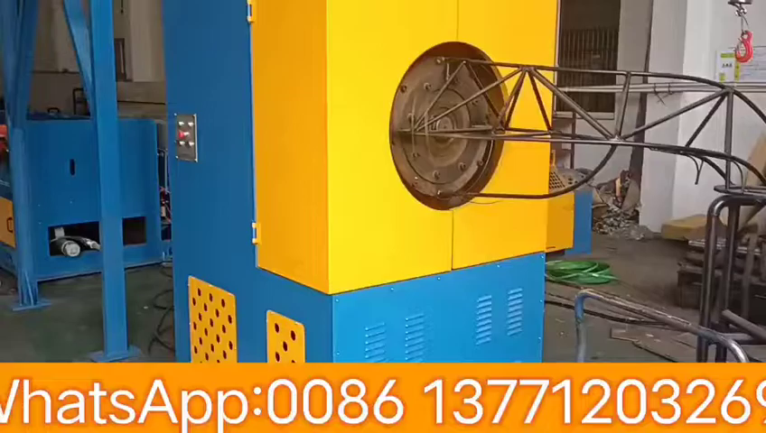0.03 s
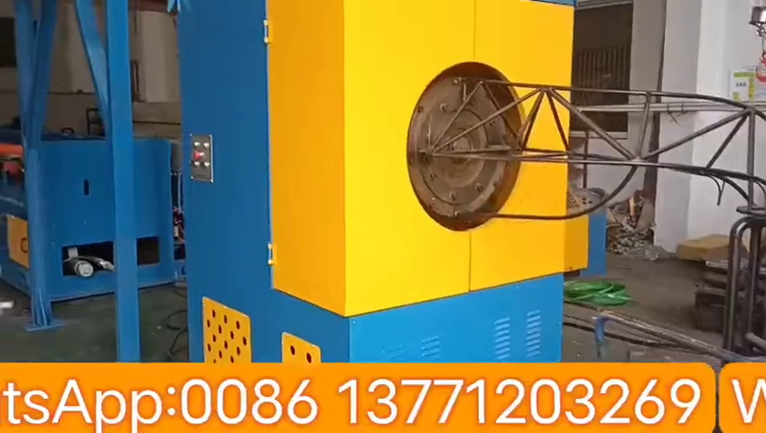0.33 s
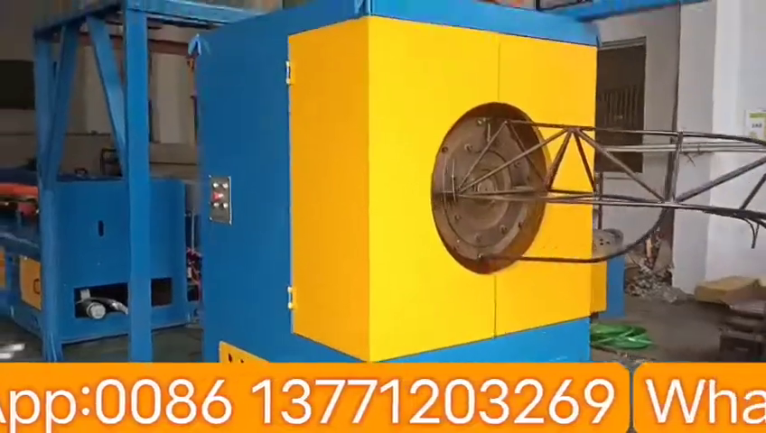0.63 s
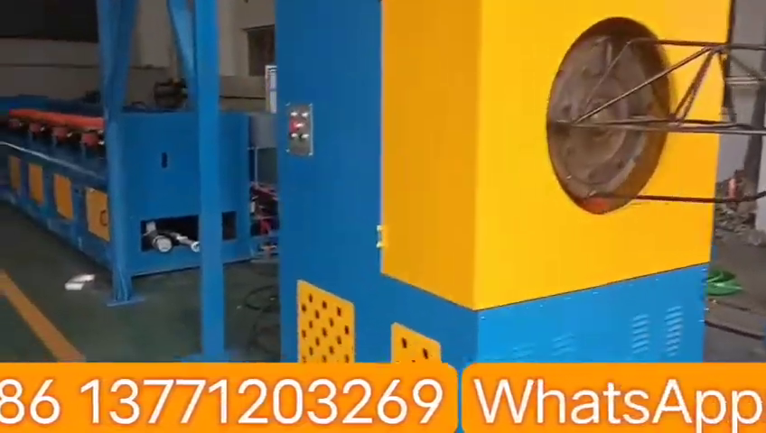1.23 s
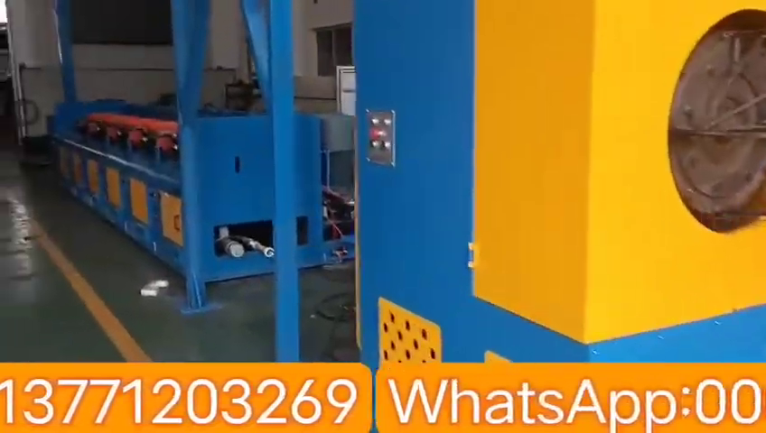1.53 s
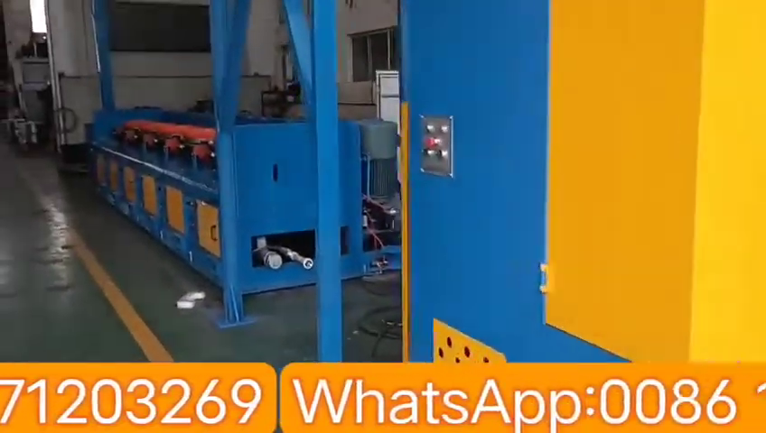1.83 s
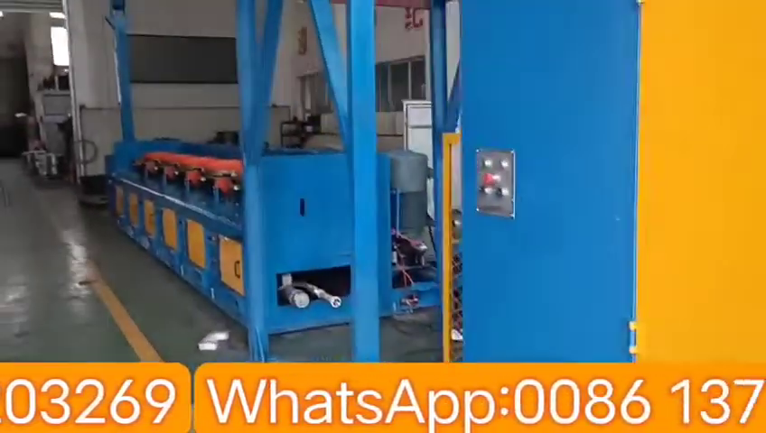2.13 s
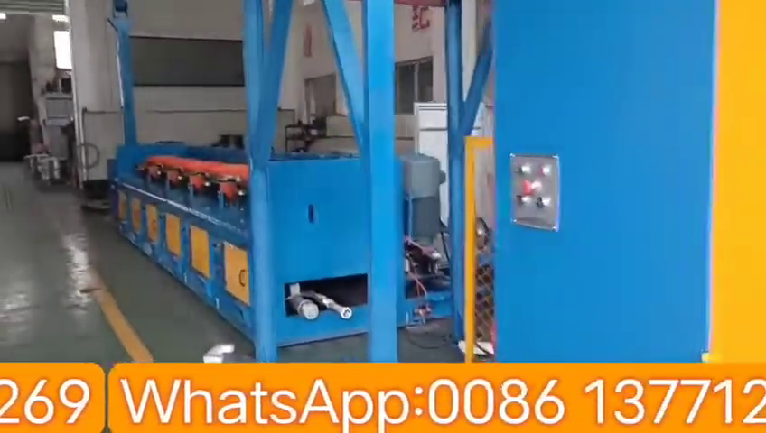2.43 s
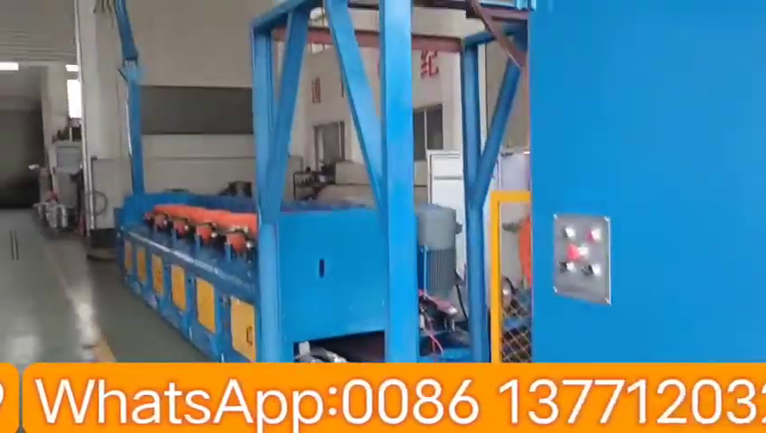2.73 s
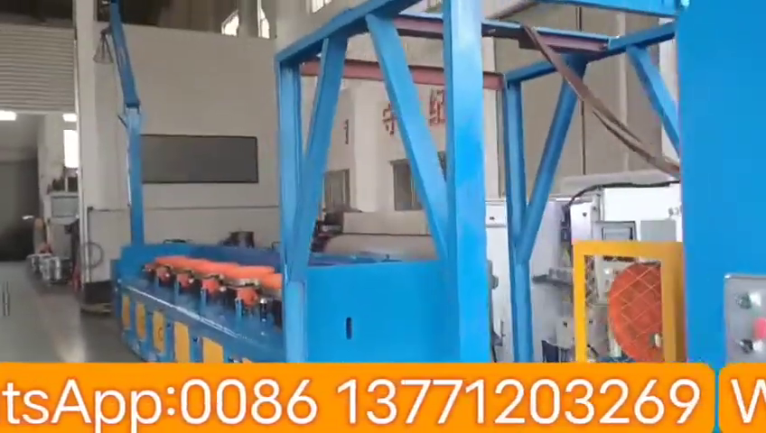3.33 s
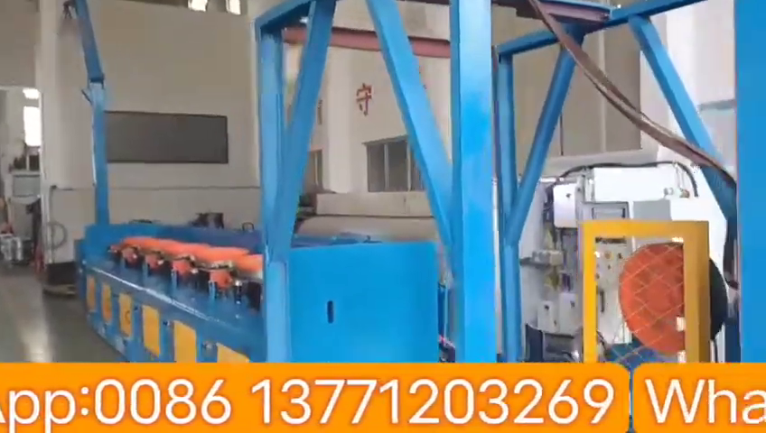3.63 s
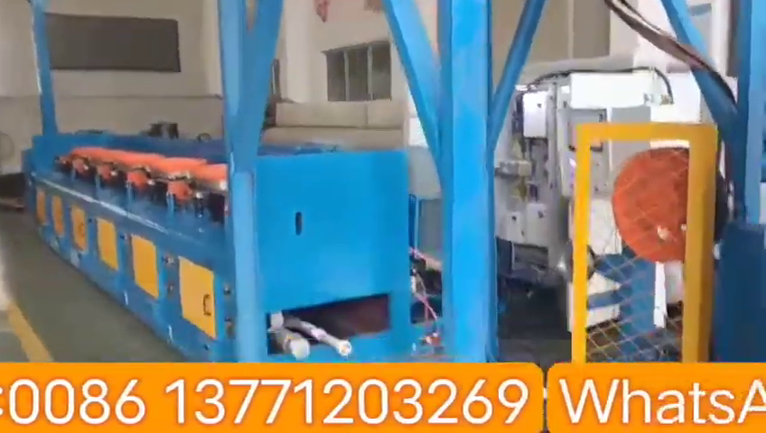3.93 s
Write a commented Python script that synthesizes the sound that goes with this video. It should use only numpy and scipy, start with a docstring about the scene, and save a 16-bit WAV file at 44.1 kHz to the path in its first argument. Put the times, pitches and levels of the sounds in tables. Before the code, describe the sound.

Factory machinery scrapes and hisses steadily as wire winds on, over humming and whining motors.

```python
"""Factory hall, walking past the coiler of a wire drawing line; the sound fades in.
Wire slips on steel: rasp and hiss. It taps the cage, sings on the drum once a turn
and squeals where it catches. Underneath: gearbox drone, whining gears and motor drives,
whirring drum, floor rumble, humming and booming sheet-steel housings."""
import sys
import numpy as np
from scipy import signal
from scipy.fft import rfft, irfft
from scipy.io import wavfile

SR = 44100
rng = np.random.default_rng(int(sys.argv[2]) if len(sys.argv) > 2 else 0)


def inscribe(sig):
    """Save sig as 16-bit PCM at rate SR to the path in sys.argv[1].

    A 1-D sig is mono; a 2-D sig holds one channel per row.
    Samples are clipped to [-1, 1] before scaling.
    """
    pcm = np.round(np.clip(np.atleast_2d(sig).T, -1, 1) * 32767)
    wavfile.write(sys.argv[1], SR, pcm.astype(np.int16))


N = 176400

TURN_HZ, TURN_AT_S = 6.17, .06
SLIPS_PER_S, SLIP_SPREAD_DB, SLIP_SHARE = 1800, 5, .34
BUZZ_HZ, BUZZ_DEPTH = 100, .097
TAPS_PER_S = 40
GEAR_HZ, GEAR_PULSE_DEPTH, THROB_S = 678, .63, .058
WHISTLE_HZ = 8010
GRATE_DB, NOTE_DB = -8, -1.2
TICK_DECAY_S, TAIL_DECAY_S, TAIL_DB = .0011, .024, -6
FADE_AT_S, FADE_S, FADE_POWER, CUTOFF_HZ = .19, .25, .84, 12100

# levels along the walk, before trims (time [s], hum [dB], drone [dB], whirr [dB], rasp [dB], hiss [dB])
WALK_LEVELS = [(0.3, -66, -53, -44.5, -40.5, -51), (0.42, -47, -46.5, -47, -42.5, -49),
               (0.63, -49.5, -52.5, -46, -41.5, -51), (0.9, -49.5, -50.5, -50.5, -42.5, -52),
               (1.1, -50.5, -50.5, -46, -42, -50), (1.33, -54.5, -49, -50.5, -42.5, -52),
               (1.5, -52.5, -55.5, -50.5, -43.5, -49.5), (1.8, -49.5, -45.5, -55.5, -43.5, -49),
               (2.1, -53.5, -47.5, -49.5, -44.5, -50.0), (2.35, -45, -43.5, -55.5, -44, -50),
               (2.53, -44, -52, -51.5, -44, -51), (2.85, -49, -45.5, -58, -45.5, -51),
               (3.1, -45, -46, -51, -45.5, -52), (3.3, -45, -50, -52.5, -47, -54.5),
               (3.55, -52.5, -46, -50.5, -46.5, -55.5), (3.8, -46.5, -44.5, -46.5, -47.5, -55),
               (4.0, -47.5, -44.5, -52, -47, -63.5)]
HUM_TRIM_DB, DRONE_TRIM_DB, WHIRR_TRIM_DB, RASP_TRIM_DB, HISS_TRIM_DB = -2, 2, 1, -.5, 5.5
# base levels along the walk (time [s], level [dB])
RUMBLE_LEVELS = [(.4, -69.5), (.76, -67), (.83, -59), (.95, -77), (1.88, -61.5), (1.99, -80), (2.16, -56),
                 (2.27, -71), (2.55, -63), (2.83, -55), (2.95, -68), (3.03, -59), (3.12, -67), (3.27, -53),
                 (3.63, -51), (4, -60.5)]
MAIN_GEAR_LEVELS = [(.3, -62), (.5, -55), (1.25, -52), (1.44, -60), (1.6, -52), (2.35, -51), (2.55, -53),
                    (2.85, -52), (3.9, -50.5)]
WHISTLE_LEVELS = [(.4, -63), (1.3, -56), (1.9, -53), (2.5, -55.5), (2.75, -52), (3.2, -57), (3.5, -51),
                  (3.7, -57.5), (3.9, -52.5)]
RUB_LEVELS = [(.4, -48), (.8, -52), (1.4, -49), (2.1, -47), (2.5, -54), (3, -53), (3.5, -60), (4, -54)]

# noise spectra (frequency [Hz], relative density [dB])
RASP_SPECTRUM = [(150, -23), (500, -17), (1000, -13), (1350, 3.5), (1600, 3), (1850, 4), (2200, 4.5),
                 (2600, 4.5), (3050, 0), (3350, 2.5), (3600, 2), (4200, 2.5), (5100, -10), (7000, -6),
                 (12000, -23)]
HISS_SPECTRUM = [(1500, -27), (3500, -6), (4600, 1.5), (5200, -2), (6000, 3), (6900, 2), (7500, -1),
                 (8900, -0.5), (9800, 2.5), (10700, 3), (11400, -5.5), (12100, -2)]
RUMBLE_SPECTRUM = [(15, -23), (35, 0), (50, -4.5), (75, 2), (125, 5.5), (180, -4), (300, 9), (800, -35)]
HUM_SPECTRUM = [(60, -44), (150, -14), (200, -7), (238, -4), (280, -2.5), (335, 4.5), (375, 2), (440, -17),
                (700, -34.5)]
DRONE_SPECTRUM = [(250, -42), (400, -11), (480, -1.5), (560, -0.5), (650, 2.5), (740, -3.5), (820, -17.5),
                  (1020, -35), (1350, -15), (1700, -14.5), (4000, -39)]
WHIRR_SPECTRUM = [(450, -63), (720, -1), (830, 4.5), (920, -2.5), (1050, -3.5), (1250, -1), (1600, -45)]
GRATE_SPECTRUM = [(4800, -22), (6000, -1), (6700, -2), (9000, -4)]
TICK_SPECTRUM = [(100, -50), (400, -6), (1200, -1), (2300, 8), (3200, -0.5), (4200, -6), (6000, -7),
                 (12000, -14)]

# cage resonances (frequency [Hz], t60 [s], relative level [dB])
CAGE_MODES = [(1359, 0.13, -1), (1809, 0.088, -0.5), (2014, 0.07, 0), (2300, 0.06, -4.5), (2600, 0.069, 0),
              (3233, 0.093, -6)]
# resonances of wire on the drum (frequency [Hz], half-width [Hz], relative level [dB])
DRUM_WIRE_MODES = [(5947, 36, -2), (6018, 36, 0), (6085, 60, -6), (6278, 70, 0), (6648, 60, -3),
                   (6750, 600, -3)]
# gear and drive tones (frequency [Hz], half-width [Hz], mid-walk level [dB], slope [dB/s])
GEAR_TONES = [(331.3, 91, -59, -1.5), (1358, 74, -60.5, 4.5), (1927, 26, -60, 0)]
DRIVE_TONES = [(2850, 50, -58, -1), (3272, 26, -60.5, -1.5), (3958, 40, -55, 1), (4046, 14, -54, -0.5),
               (7763, 38, -63, 0.4), (8262, 100, -63, -0.3)]

# main gear throbs (centre [s], level [dB])
GEAR_THROBS = [(.37, -41), (.455, -43), (.555, -50), (.765, -50), (.855, -42.5), (.935, -48), (1.06, -43.5),
               (1.545, -37), (1.63, -40), (1.795, -38), (1.945, -39.5), (2.07, -40), (2.125, -43.5),
               (2.28, -48), (2.375, -43.5), (2.645, -46.5), (2.77, -43), (2.86, -51), (2.975, -41),
               (3.135, -41.5), (3.26, -59), (3.38, -42.5), (3.53, -52), (3.655, -42.5), (3.825, -40.5),
               (3.885, -41)]
# brief resonances (start [s], length [s], pitch [Hz], level [dB])
METAL_RINGS = [(.51, .07, 2240, -49), (.58, .08, 1340, -47), (1.3, .11, 3275, -48),
               (1.34, 0.055, 2300, -48), (1.68, .043, 1930, -47), (1.98, 0.072, 1936, -46),
               (2.3, .055, 3170, -48.5), (2.635, 0.04, 1365, -45), (2.75, 0.045, 1450, -44),
               (2.81, 0.05, 2850, -48), (2.965, .045, 2850, -48)]
HOUSING_BOOMS = [(.54, 0.15, 324.4, -48.5), (.69, 0.062, 526, -52), (.745, 0.043, 334, -44),
                 (1.04, 0.076, 593, -45.5), (1.66, 0.13, 238.4, -46), (1.72, 0.053, 280, -42),
                 (1.83, 0.1, 239, -44.5), (1.995, 0.067, 501, -41.5), (2.075, 0.066, 393, -44.5),
                 (2.085, 0.052, 238, -48), (2.185, 0.044, 538, -46), (2.3, 0.14, 248, -45.5),
                 (2.32, .07, 564, -44), (2.46, 0.099, 328, -45), (2.47, 0.043, 234, -44),
                 (2.59, 0.08, 240.6, -44), (2.765, 0.052, 516, -39), (3.17, 0.079, 324, -48),
                 (3.385, 0.076, 227, -43)]
# wire catches (start [s], length [s], pitch before mode lock [Hz], base level [dB])
WIRE_CATCHES = [(0.581, 0.1, 6285, -47.5), (0.725, 0.069, 6280, -51), (0.811, 0.05, 6080, -46),
                (0.899, 0.067, 6020, -40), (1.008, 0.039, 6290, -49), (1.081, 0.05, 6270, -44.5),
                (1.17, 0.041, 5890, -44.5), (1.308, 0.094, 5980, -38.5), (1.33, 0.036, 6280, -67),
                (1.34, 0.27, 6018, -58), (1.416, 0.036, 6275, -45.5), (1.501, 0.05, 5900, -47),
                (1.655, 0.13, 6050, -43), (1.725, 0.046, 6285, -59), (1.863, 0.034, 6280, -43.5),
                (2.033, 0.024, 6290, -42.5), (2.12, 0.086, 6648, -46)]
# wire strikes on the cage (time [s], level before taper [dB])
CAGE_TICKS = [(0.7838, -49), (1.035, -45), (1.0417, -46.5), (1.1538, -50), (1.1644, -51), (1.2533, -44.5),
              (1.3603, -47), (1.847, -48), (3.647, -51)]


def amp(db):
    """Decibels to gain."""
    return 10 ** (np.asarray(db) / 20)


def unit(x):
    """Scale to rms 1."""
    return x / np.sqrt(np.mean(x ** 2) + 1e-20)


def clock():
    """Sample times [s]."""
    return np.arange(N) / SR


def level(table, column=1):
    """Gain over time from a dB column."""
    rows = np.array(table)
    return amp(np.interp(clock(), rows[:, 0], rows[:, column]))


def colour(x, spectrum):
    """Filter x by a spectrum; rms 1."""
    points_hz, db = np.transpose(spectrum)
    hz = np.fft.rfftfreq(len(x), 1 / SR)
    gain = amp(np.interp(np.log(hz + 1), np.log(points_hz), db))
    return unit(irfft(rfft(x) * gain, len(x)))


def drift(rate_hz):
    """Smooth random motion; rms 1."""
    hz = np.fft.rfftfreq(N, 1 / SR)
    lowpass = np.exp(-.5 * (hz / rate_hz) ** 2) * (hz > 0)
    return unit(irfft(rfft(rng.standard_normal(N)) * lowpass, N))


def tone(hz, half_width_hz):
    """Tone blurred by the hall: a narrow peak with random phases."""
    bins_hz = np.fft.rfftfreq(N, 1 / SR)
    peak = 1 / (1 + ((bins_hz - hz) / (half_width_hz * 1.04)) ** 2)
    return unit(irfft(peak * np.exp(2j * np.pi * rng.random(len(bins_hz))), N))


def flicker(x, depth_db, span_hz, span_s):
    """Random gain in time-frequency patches; rms 1."""
    bands = signal.stft(x, nperseg=1024, noverlap=768)[2]
    across = np.fft.fftfreq(bands.shape[0], SR / 1024)[:, None]
    along = np.fft.fftfreq(bands.shape[1], 256 / SR)
    blur = np.exp(-(across * span_hz) ** 2 - (along * span_s) ** 2)
    patches = unit(np.fft.ifft2(np.fft.fft2(rng.standard_normal(bands.shape)) * blur).real)
    bands *= amp(depth_db * np.minimum(patches, 2))
    return unit(signal.istft(bands, nperseg=1024, noverlap=768)[1][:N])


def add(mix, start_s, sound):
    """Mix in at start_s."""
    part = mix[max(round(start_s * SR), 0):][:len(sound)]
    part += sound[:len(part)]


def swells(events, wobble_hz, rate_hz, flutter_db):
    """Resonances that rise and fall, unsteady in pitch and level."""
    out, wobble, flutter = np.zeros(N), drift(rate_hz), drift(rate_hz)
    for start_s, length_s, hz, db in events:
        n = int(length_s * SR)
        at = int(rng.random() * N / 2)
        phase = 2 * np.pi * np.cumsum(hz + wobble_hz * wobble[at:at + n]) / SR
        envelope = unit(amp(flutter_db * flutter[at:at + n]) * np.sin(np.pi * np.arange(n) / n))
        add(out, start_s, amp(db) * envelope * np.sin(phase))
    return out


def turn(depth_db):
    """One lopsided swell per drum turn [dB]."""
    angle = 2 * np.pi * TURN_HZ * (clock() - TURN_AT_S)
    return depth_db * (np.cos(angle - .4) + .14 * np.cos(2 * angle))


def scrape():
    """Tiny slips of wire on steel, merging into noise."""
    sizes = rng.standard_normal(N) * amp(SLIP_SPREAD_DB * np.minimum(rng.exponential(1, N), 3))
    slips = unit(sizes * (rng.random(N) < SLIPS_PER_S / SR))
    grains = unit(np.tanh(slips / 10))
    return np.sqrt(SLIP_SHARE) * grains + np.sqrt(1 - SLIP_SHARE) * rng.standard_normal(N)


def wire_rasp():
    """Rasp and hiss pulse with the drum, chatter and buzz with the mains."""
    buzz = 1 - BUZZ_DEPTH * np.cos(2 * np.pi * BUZZ_HZ * clock())
    chatter = amp(1.05 * drift(rate_hz=27))
    rasp = flicker(colour(scrape(), RASP_SPECTRUM), depth_db=1.74, span_hz=704, span_s=.022)
    rasp *= level(WALK_LEVELS, column=4) * amp(RASP_TRIM_DB + turn(depth_db=.97))
    hiss = flicker(colour(scrape(), HISS_SPECTRUM), depth_db=2.5, span_hz=930, span_s=.025)
    hiss *= level(WALK_LEVELS, column=5) * amp(HISS_TRIM_DB + turn(depth_db=.5))
    return (rasp + hiss) * buzz * chatter


def cage_rattle():
    """Wire loops tap the cage bars; level follows the rasp."""
    t, out = np.arange(4096) / SR, np.zeros(N)
    for hz, t60_s, db in CAGE_MODES:
        taps = rng.standard_normal(N) * (rng.random(N) < TAPS_PER_S / SR)
        mode = amp(db) * np.exp(-np.log(1000) * t / t60_s) * np.sin(2 * np.pi * hz * t)
        out += signal.oaconvolve(taps, mode)[:N]
    return unit(out) * level(WALK_LEVELS, column=4) * amp(turn(depth_db=1) - 9)


def machinery():
    """Floor rumble, housing hum, gearbox drone, drum whirr: wavering noise bands."""
    out = colour(rng.standard_normal(N), RUMBLE_SPECTRUM)
    out *= level(RUMBLE_LEVELS) * amp(2.2 * drift(rate_hz=7.4))
    layers = (HUM_SPECTRUM, HUM_TRIM_DB), (DRONE_SPECTRUM, DRONE_TRIM_DB), (WHIRR_SPECTRUM, WHIRR_TRIM_DB)
    for column, (spectrum, trim_db) in enumerate(layers, start=1):
        band = flicker(colour(rng.standard_normal(N), spectrum), depth_db=4, span_hz=276, span_s=.042)
        out += band * level(WALK_LEVELS, column) * amp(trim_db)
    return out


def whines():
    """Gear and drive tones on slow level ramps, plus the drives' switching whistle."""
    from_middle_s = clock() - N / SR / 2
    tones = sum(tone(hz, half_width_hz) * amp(db + db_per_s * from_middle_s)
                for hz, half_width_hz, db, db_per_s in GEAR_TONES + DRIVE_TONES)
    return tones + tone(WHISTLE_HZ, half_width_hz=26) * level(WHISTLE_LEVELS)


def main_gear():
    """Gear tone: grows as its gearbox comes into view, pulses twice a turn, throbs."""
    pulse = 1 + GEAR_PULSE_DEPTH * np.cos(2 * np.pi * 2 * TURN_HZ * clock())
    events = [(centre_s - THROB_S / 2, THROB_S, GEAR_HZ, db) for centre_s, db in GEAR_THROBS]
    throbs = swells(events, wobble_hz=4, rate_hz=30, flutter_db=1)
    return tone(GEAR_HZ, half_width_hz=26) * level(MAIN_GEAR_LEVELS) * pulse + throbs


def rubbing(wire_ring):
    """Wire rubs on the drum and sings once a turn."""
    return wire_ring * level(RUB_LEVELS) * amp(turn(depth_db=8.5) - 11.9)


def metal_rings():
    """Wire and cage ring briefly."""
    return swells(METAL_RINGS, wobble_hz=28, rate_hz=90, flutter_db=3)


def booms():
    """Sheet-steel housings resonate."""
    return swells(HOUSING_BOOMS, wobble_hz=9, rate_hz=40, flutter_db=1.8)


def squeals(wire_ring):
    """Wire catches: it grates and squeals, locked to its nearest mode."""
    modes_hz = np.array(DRUM_WIRE_MODES)[:, 0]
    envelope, notes = np.zeros(N), []
    for start_s, length_s, hz, db in WIRE_CATCHES:
        arch = unit(np.sin(np.linspace(0, np.pi, int(length_s * SR))))
        add(envelope, start_s, amp(db + GRATE_DB) * arch)
        locked_hz = modes_hz[np.argmin(abs(modes_hz - hz))]
        notes.append((start_s, length_s, locked_hz, db + NOTE_DB))
    grating = envelope * unit(colour(scrape(), GRATE_SPECTRUM) + .5 * wire_ring)
    return grating + swells(notes, wobble_hz=26, rate_hz=230, flutter_db=2.7)


def ticks():
    """Wire strikes the cage: dry knock, short rattling tail."""
    t, out = np.arange(4096) / SR, np.zeros(N)
    decay = np.exp(-t / TICK_DECAY_S) + amp(TAIL_DB) * np.exp(-t / TAIL_DECAY_S)
    taper = 1 - t / t[-1]
    for start_s, db in CAGE_TICKS:
        knock = colour(decay * rng.choice([-1., 1.], len(t)), TICK_SPECTRUM)
        add(out, start_s, amp(db) * knock * taper)
    return out


def scene():
    """Whole line, mono."""
    wire_ring = unit(sum(amp(db) * tone(hz, half_width_hz) for hz, half_width_hz, db in DRUM_WIRE_MODES))
    running = wire_rasp() + cage_rattle() + machinery() + whines() + main_gear() + rubbing(wire_ring)
    events = metal_rings() + booms() + squeals(wire_ring) + ticks()
    return (running + events)[None]


def record(dry):
    """Fade-in, then low-pass."""
    fade = np.clip((clock() - FADE_AT_S) / FADE_S, 0, 1) ** FADE_POWER
    lowpass = signal.firwin(1023, CUTOFF_HZ, window=("kaiser", 9), fs=SR)
    return signal.oaconvolve(dry * fade, lowpass[None], "same")


dry = scene()
out = record(dry)
inscribe(out)
```